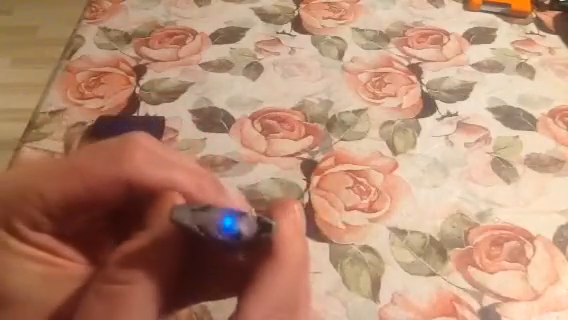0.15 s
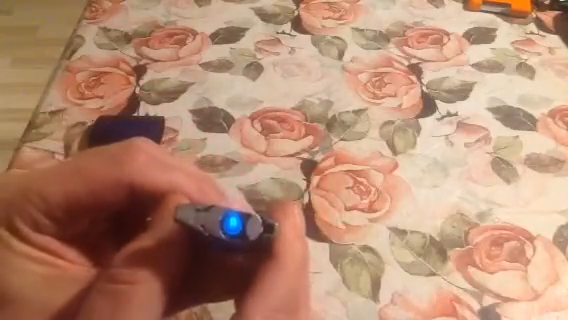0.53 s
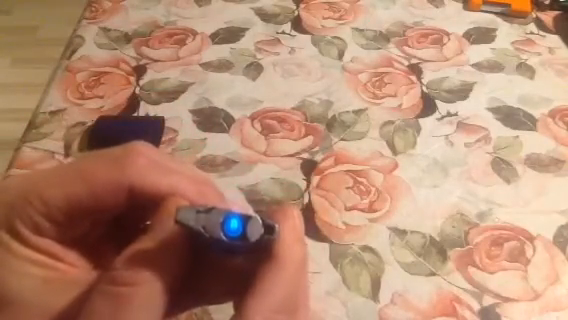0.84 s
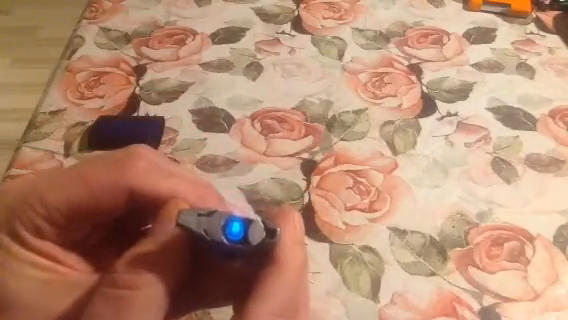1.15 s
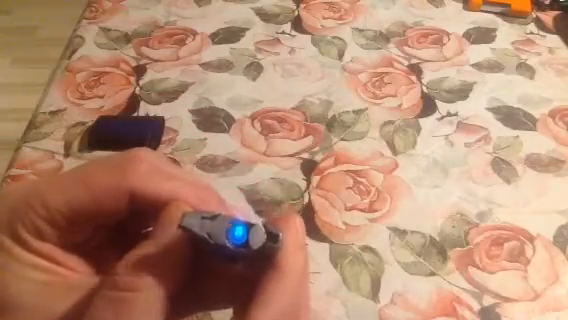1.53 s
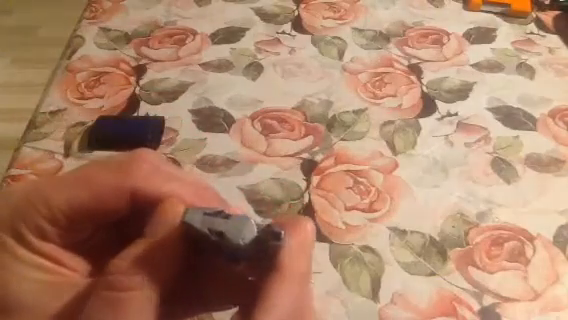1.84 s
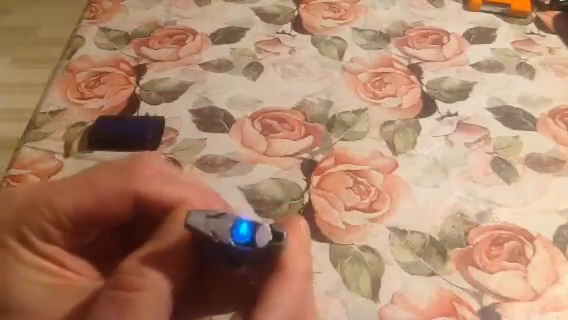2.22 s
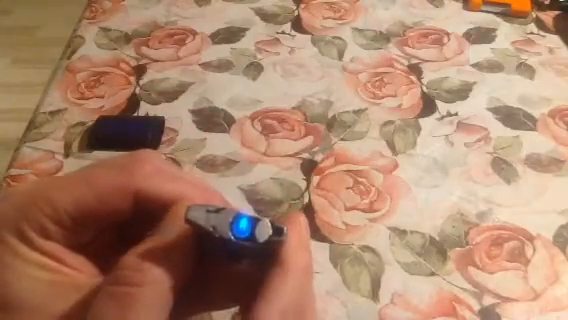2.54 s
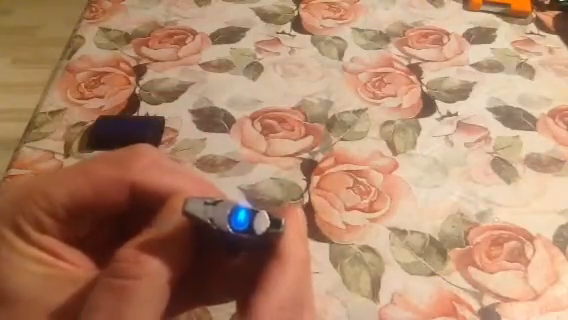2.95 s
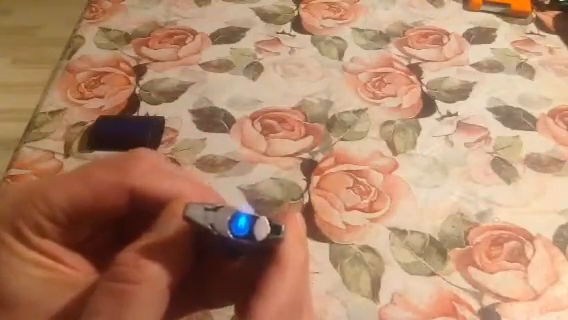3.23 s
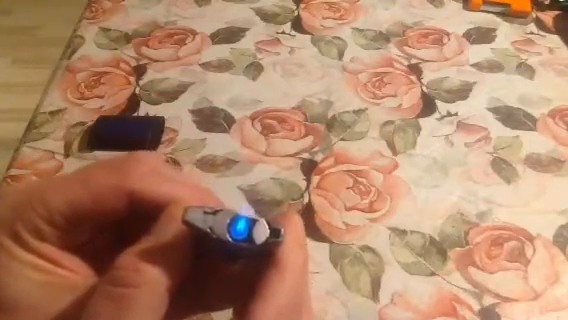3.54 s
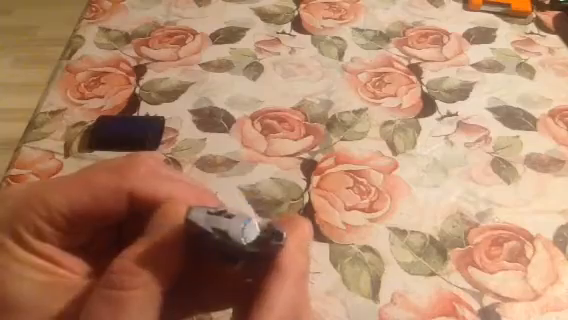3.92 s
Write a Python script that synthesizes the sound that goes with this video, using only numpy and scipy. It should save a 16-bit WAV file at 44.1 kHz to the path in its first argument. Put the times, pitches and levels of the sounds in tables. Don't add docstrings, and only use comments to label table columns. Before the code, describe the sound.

Close up in a quiet room, a jet lighter already hissing gas snaps hard and lights with a soft puff. The flame roars and hisses steadily for about a second and a half, then small clicks and a squeak end it. After a short near-silent gap, gas hisses briefly, a second snap lights a slightly longer burn, and it clicks off again.

```python
import sys
import numpy as np
from scipy import signal
from scipy.fft import rfft, irfft
from scipy.io import wavfile
from scipy.ndimage import uniform_filter1d, minimum_filter1d

SR = 44100
rng = np.random.default_rng(int(sys.argv[2]) if len(sys.argv) > 2 else 0)


def file_out(sig):
    cols = np.atleast_2d(sig).T
    lim = np.clip(cols, -1, 1)
    pcm = np.round(lim * 32767).astype(np.int16)
    wavfile.write(sys.argv[1], SR, pcm)


def convert_level_to_amplitude(level_db):
    exponent = np.asarray(level_db, float) / 20
    return 10 ** exponent


N = 179972

# (lights [s], starts closing [s], out [s], roar level [dB], swell [dB/s])
BURNS = [
    (0.189, 1.655, 1.681, -55.5, 1.94),
    (2.137, 3.889, 3.91, -55.5, 2.5),
]
# (frequency [Hz], density [dB per Hz])
ROAR_SPECTRUM = [(59, -33), (100, -21), (202, -13), (489, -14), (615, -7), (1020, -7), (1290, -2.5),
                 (1590, -12), (1900, -3.5), (3980, -10), (5000, -19), (6500, -50.5), (11000, -120)]
# (frequency [Hz], density [dB per Hz])
JET_SPECTRUM = [(3000, -34.5), (3600, -16), (4300, -9), (5000, -0.5), (6100, 1), (7200, -6.5), (8300, -7.5),
                (9200, -3.5), (9700, 0), (10600, 2.5), (11600, 4), (12600, -3), (13300, -10),
                (15400, -13.5)]
# (frequency [Hz], width [Hz], depth [dB])
HAND_DIPS = [(525, 51, -3.5), (1057, 163, -6), (1640, 200, -1), (2220, 370, -4), (3502, 148, -11.5),
             (3977, 260, -12), (9950, 210, -0.5)]
# (frequency [Hz], width [Hz], depth [dB])
TABLE_DIPS = [(2810, 110, -13), (4600, 90, -20)]
OPENING_S, SETTLE_S, DYING_S = 0.027, 0.24, 0.045
COLD_ROAR_DB, HISS_UNDER_ROAR_DB = -3, -4
ROAR_FALL_DB, HISS_FALL_DB = -12, -9

# (valve opens [s], spark [s], level [dB])
PRESSES = [
    (-.06, 0.206, -44),
    (2.088, 2.17, -48.5),
]
# (frequency [Hz], density [dB per Hz])
GAS_SPECTRUM = [(300, -30.5), (550, -12), (800, -37), (1900, -20.5), (2600, -23.5), (3800, -15.5),
                (5000, -13), (6000, -10), (6800, 0), (7600, 0.5), (8800, -4.5), (11200, -0.5), (12000, -6),
                (13500, -20), (15400, -15.5)]
# (frequency [Hz], width [Hz], depth [dB])
GAS_DIPS = [(8130, 335, -15), (9750, 300, -3.5), (12300, 500, -15), (14800, 400, -10)]
GAS_ATTACK_S, GAS_START_DB, GAS_SAG_DB_PER_S = 0.011, -13, 36.5
COCKING_S, COCKING_DB, BURN_OFF_DB_PER_S = 0.032, -1.5, 720

# (frequency [Hz], width [Hz], level [dB])
SNAP_BODY_A = [(1228, 170, -13), (2276, 300, -9.5), (3270, 300, -6), (4900, 540, -4), (6000, 250, -3),
               (7660, 500, 3.5), (8820, 410, -4.5), (9520, 440, 1.5), (12000, 850, -4.5),
               (13200, 500, -3.5), (15000, 530, -8)]
# (frequency [Hz], width [Hz], level [dB])
SNAP_BODY_B = [(1200, 160, -14), (2400, 150, -15), (3120, 290, -5.5), (4460, 630, -4), (6000, 560, -6.5),
               (7030, 660, -3.5), (9150, 500, 2.5), (11300, 490, -8.5), (12860, 580, -4), (13920, 270, -8),
               (14860, 250, -13)]
# (frequency [Hz], width [Hz], level [dB])
RESET_BODY = [(2080, 400, -19), (3490, 206, 0.5), (4280, 230, 3.5), (5000, 370, -1), (7560, 460, -1.5),
              (9800, 420, -5), (11500, 370, -4.5), (13330, 480, -3.5)]
# (frequency [Hz], width [Hz], level [dB])
STOP_BODY_A = [(2270, 130, -10), (3710, 310, -6.5), (5200, 180, -11.5), (5900, 170, -9), (6960, 580, -5),
               (9040, 260, -5), (10600, 460, -9), (11200, 220, -4.5), (12830, 770, -5), (13650, 430, 0.5)]
# (frequency [Hz], width [Hz], level [dB])
STOP_BODY_B = [(2270, 190, -8.5), (4700, 510, -2.5), (6480, 220, -4), (7130, 370, -3), (8740, 350, -0.5),
               (10400, 330, -5), (11300, 470, -9), (12900, 320, -1), (13500, 260, -10), (14200, 280, 0)]
# (time [s], peak level [dB], rattle time [ms])
SNAPS_A = [
    (.1990, -30.5, 1.9),
    (.2013, -3, 1.3),
    (.2020, -8, 0.58),
    (.2028, -9.5, 2.2),
    (.2045, -22, 1.8),
    (.2135, -31, 1.5),
]
# (time [s], peak level [dB], rattle time [ms])
SNAPS_B = [
    (2.1575, -35, 1.2),
    (2.1599, -2, 0.85),
    (2.1602, -13.5, 0.97),
    (2.1609, -10, 1.8),
    (2.1632, -16.5, 1.3),
    (2.1685, -26, 2.5),
    (2.172, -47, 1.1),
]
# (time [s], peak level [dB], rattle time [ms])
RESETS = [
    (1.6065, -18, 0.96),
    (1.6084, -26.5, 1.7),
    (3.850, -38.5, 1.2),
    (3.8566, -17.5, 0.3),
    (3.8582, -27, 1.7),
]
# (time [s], peak level [dB], rattle time [ms])
STOPS_A = [
    (1.6794, -23, 0.56),
    (1.682, -30, 2.6),
    (1.6943, -35, .6),
    (1.9526, -50.5, 1.2),
    (1.977, -51, 1.2),
]
# (time [s], peak level [dB], rattle time [ms])
STOPS_B = [
    (3.9146, -23, 1.2),
    (3.9167, -27, 1.7),
]

# (time [s], puff [dB], knock [dB], spring [dB], case [dB])
PUFFS = [
    (0.2039, -34.5, -33, -49.5, -41.5),
    (2.1611, -38, -31.5, -45.5, -44.5),
]
# (frequency [Hz], level [dB], T60 [s])
PUFF_MODES = [(184, 4.5, 0.033), (250, 2, 0.023), (317, -2, 0.03), (463, -8.5, 0.01), (133, -18, 0.17),
              (914, -6, 0.02), (1300, -9, 0.011)]
KNOCK_HZ, SPRING_HZ, CASE_HZ = 2247, 5830, 7540

# (centre time [s], frequency [Hz], peak level [dB], fall time [ms])
SQUEAKS = [
    (1.6017, 12000, -39, 1.4),
    (1.6055, 13500, -38, 2.5),
    (1.684, 11300, -49, 3.3),
    (3.853, 12300, -41, 2.5),
    (3.8555, 13500, -40, 2.1),
    (3.920, 11200, -51, 4),
]
# (time [s], frequency [Hz], peak level [dB], fall time [ms])
SLIDES = [
    (1.6472, 12500, -41, 4.5),
    (3.8825, 12450, -42, 5.0),
]
# (pitch ratio [1], level [dB])
SLIDE_CHORD = [(1.0, 0.5), (1.115, -11), (1.2, -7)]
# (time [s], frequency [Hz], peak level [dB])
PINGS = [
    (3.881, 4900, -47),
    (3.888, 7200, -45),
    (3.931, 4180, -54),
    (3.95, 4000, -57),
]
SQUEAK_RISE_MS, PING_FALL_MS = 1.7, 1.3

# (frequency [Hz], T60 [s])
ROOM_T60 = [(100, 0.24), (1000, 0.63), (4000, 0.35), (8000, 0.41), (15000, .16)]
# (frequency [Hz], density [dB per Hz])
ROOM_SPECTRUM = [(150, -10), (600, -15.5), (1500, -18.5), (3200, -10), (4500, -7.5), (5700, -7.5),
                 (6500, -9.5), (7500, -8.5), (8300, -11.5), (9500, -9.5), (12000, -8.5), (15000, -18)]
ROOM_DB = -24

# (frequency [Hz], density [dB per Hz])
FLOOR_SPECTRUM = [(24, -62), (40, -36), (98, -20.5), (119, -12.5), (201, -5.5), (271, -10), (292, -6),
                  (339, -5.5), (480, -14.5), (1510, -15.5), (1710, -19.5), (12500, -23.5), (15200, -21)]
FLOOR_DB = -64.5

# (frequency [Hz], margin [dB])
TREBLE_MARGIN = [(11500, -45), (12300, -23), (12800, -25), (13200, -20), (13700, -30), (14250, -18),
                 (14700, -25), (15200, -22.5)]
TOP_HZ, LOUD_DB, TOP_OPENS_DB = 15350, -52, -70
OVERLOAD = 0.7


def rms_one(x):
    return x / np.sqrt(np.mean(x ** 2) + 1e-20)


def at_hz(points, hz):
    known_hz, value = np.array(points).T
    return np.interp(np.log(hz + 1), np.log(known_hz), value)


def drift(rate_hz):
    steps = rng.standard_normal(400)
    return np.interp(np.arange(N) / SR * rate_hz, np.arange(400), steps)


def coloured(spectrum, dips):
    hz = np.fft.rfftfreq(N, 1 / SR)
    level_db = at_hz(spectrum, hz)
    for centre, width, depth_db in dips:
        level_db = level_db + depth_db / (1 + ((hz - centre) / (width / 2)) ** 2)
    return rms_one(irfft(rfft(rng.standard_normal(N)) * convert_level_to_amplitude(level_db), N))


def resonate(x, hz, width_hz):
    r = np.exp(-np.pi * np.clip(width_hz, 5, 5000) / SR)
    poles = [1, -2 * r * np.cos(2 * np.pi * hz / SR), r * r]
    return signal.lfilter([(1 - r * r) / 2, 0, (r * r - 1) / 2], poles, x)


def add(out, s, piece):
    i = round(s * SR)
    out[i:i + len(piece)] += piece[:N - i]


def ring(modes, t):
    return sum(convert_level_to_amplitude(db - 60 * t / t60) * np.sin(2 * np.pi * hz * t) for hz, db, t60 in modes)


def highpass(x, order, hz):
    return signal.sosfilt(signal.butter(order, hz, "high", fs=SR, output="sos"), x)


def flame():
    t, out = np.arange(N) / SR, 0
    dips = HAND_DIPS + TABLE_DIPS
    roar = convert_level_to_amplitude(0.4 * drift(6) + 0.8 * drift(40)) * coloured(ROAR_SPECTRUM, dips)
    hiss = convert_level_to_amplitude(0.5 * drift(11) + 0.71 * drift(50)) * coloured(JET_SPECTRUM, dips)
    for lit, closing, end, roar_db, swell_db in BURNS:
        flow_db = roar_db + swell_db * np.clip(t - lit, 0, 2)
        cold_db = np.interp(t, [lit + OPENING_S, lit + SETTLE_S], [COLD_ROAR_DB, 0])
        valve_s = [lit - 0.002, lit, lit + OPENING_S, closing, end, end + DYING_S]
        layers = (roar, cold_db, ROAR_FALL_DB), (hiss, HISS_UNDER_ROAR_DB, HISS_FALL_DB)
        for layer, own_db, fall_db in layers:
            valve_db = np.interp(t, valve_s, [-90, -9, 0, 0, fall_db, -40], right=-150)
            out = out + convert_level_to_amplitude(valve_db + flow_db + own_db) * layer
    return out


def gas():
    t, gain = np.arange(N) / SR, 0
    for opens, spark, level_db in PRESSES:
        valve_s = [opens, opens + GAS_ATTACK_S, spark - COCKING_S, spark]
        valve_db = np.interp(t, valve_s, [GAS_START_DB, 0, 0, COCKING_DB], left=-150)
        sag_db = GAS_SAG_DB_PER_S * np.clip(t - opens, 0, 1)
        burn_off_db = BURN_OFF_DB_PER_S * np.clip(t - spark, 0, 1)
        gain = gain + convert_level_to_amplitude(level_db + valve_db - sag_db - burn_off_db)
    return gain * convert_level_to_amplitude(0.72 * drift(30)) * coloured(GAS_SPECTRUM, GAS_DIPS)


def blows(rows, body, crack_db):
    out, t = np.zeros(N), np.arange(1500) / SR
    for s, peak_db, rattle_ms in rows:
        contacts = convert_level_to_amplitude(-17) * rng.standard_normal(len(t)) * np.exp(-1000 * t / rattle_ms)
        contacts[0] = 1
        hit = 0
        for k, (hz, width, db) in enumerate(body):
            hit = hit + (-1) ** k * convert_level_to_amplitude(db) * resonate(contacts, hz, 1.28 * width)
        hit = hit / np.abs(hit).max() + convert_level_to_amplitude(crack_db) * resonate(contacts, 5900, 4090)
        add(out, s, convert_level_to_amplitude(peak_db) * hit / np.abs(hit).max())
    return highpass(out, 2, 1100)


def ignition():
    out, t = np.zeros(N), np.arange(12000) / SR
    for s, puff_db, knock_db, spring_db, case_db in PUFFS:
        swell = 1 - np.exp(-(t / 0.00099) ** 2)
        add(out, s, convert_level_to_amplitude(puff_db) * swell * ring(PUFF_MODES, t))
        add(out, s - 0.0023, ring([(KNOCK_HZ, knock_db, 0.02)], t))
        for hz, db, width_hz in ((SPRING_HZ, spring_db, 70), (CASE_HZ, case_db, 250)):
            uneven_tone = rms_one(resonate(rng.standard_normal(len(t)), hz, width_hz))
            add(out, s + 0.0017, convert_level_to_amplitude(db - 60 * t / 0.25) * uneven_tone)
    return highpass(out, 3, 125)


def squeaks():
    out, t = np.zeros(N), np.arange(-500, 1000) / SR
    chords = [(s, hz * ratio, peak_db + db, fall_ms)
              for s, hz, peak_db, fall_ms in SLIDES for ratio, db in SLIDE_CHORD]
    pings = [(*row, PING_FALL_MS) for row in PINGS]
    for s, hz, peak_db, fall_ms in SQUEAKS + chords + pings:
        whistle = rms_one(resonate(resonate(rng.standard_normal(len(t)), hz, 450), hz, 450))
        rise = np.exp(-(1000 * t / SQUEAK_RISE_MS) ** 2)
        fall = np.exp(-np.maximum(t, 0) * 1000 / fall_ms)
        add(out, s + t[0], convert_level_to_amplitude(peak_db) * np.where(t < 0, rise, fall) * whistle)
    return out


def room(rows):
    out, t = np.zeros(N), np.arange(16000) / SR
    edges = 110 * 2 ** np.arange(0, 7.3, 0.2)
    onset = np.clip((t - 0.003) / 0.0068, 0, 1)
    for s, peak_db, _ in rows:
        tail, white = 0, rng.standard_normal((2, len(t)))
        for k, (low, high) in enumerate(zip(edges, edges[1:])):
            bandpass = signal.butter(2, [low, high], "band", fs=SR, output="sos")
            band = signal.sosfilt(bandpass, white[k % 2])
            tail = tail + band * convert_level_to_amplitude(at_hz(ROOM_SPECTRUM, low) - 60 * t / at_hz(ROOM_T60, low))
        add(out, s, convert_level_to_amplitude(peak_db + ROOM_DB) * tail * onset)
    return out


def background():
    return convert_level_to_amplitude(FLOOR_DB + 0.56 * drift(27.33)) * coloured(FLOOR_SPECTRUM, [])


def scene():
    clicks = blows(SNAPS_A, SNAP_BODY_A, crack_db=-5) + blows(SNAPS_B, SNAP_BODY_B, crack_db=-10)
    clicks = clicks + blows(RESETS, RESET_BODY, crack_db=-13)
    clicks = clicks + blows(STOPS_A, STOP_BODY_A, crack_db=-15) + blows(STOPS_B, STOP_BODY_B, crack_db=-15)
    release_tails = room([RESETS[0], RESETS[3], STOPS_A[0], STOPS_B[0]])
    release_tails = highpass(release_tails, 2, 3200)
    tails = room([SNAPS_A[1], SNAPS_B[1]]) + convert_level_to_amplitude(4.5) * release_tails
    return (flame() + gas() + clicks + ignition() + squeaks() + tails + background())[None]


def thin_treble(x):
    hz, _, frames = signal.stft(x, SR, nperseg=1024)
    bands = (np.abs(frames[:512]) ** 2).reshape(128, 4, -1).sum(axis=1)
    level_db = 10 * np.log10(uniform_filter1d(bands, size=5, axis=1) + 1e-20)
    peak_db = level_db[2:].max(axis=0)
    loudest_db = uniform_filter1d(minimum_filter1d(peak_db, size=7), size=5) + 2.5
    centre_hz = hz[:512].reshape(128, 4).mean(axis=1)[:, None]
    above_margin = level_db > loudest_db + at_hz(TREBLE_MARGIN, centre_hz)
    keep = above_margin | (peak_db > LOUD_DB) | (centre_hz < 11500)
    top = centre_hz > TOP_HZ
    keep = np.where(top, 10 * np.log10(bands + 1e-20) > TOP_OPENS_DB, keep)
    frames[:512] *= np.repeat(keep * np.where(top, convert_level_to_amplitude(-11), 1), 4, axis=0)
    return signal.istft(frames, SR, nperseg=1024)[1][:N]


def roll_off(x):
    return signal.sosfilt(signal.butter(12, 16600, fs=SR, output="sos"), x)


def record(dry):
    cut = highpass(dry[0], 5, 108)
    cut = np.clip(cut, -OVERLOAD, OVERLOAD)
    rumble = convert_level_to_amplitude(-106) * coloured([(20, -21.0), (70, 3.5), (120, -29.5), (15000, -88)], [])
    mix = thin_treble(cut + rumble)[None]
    return roll_off(mix)


dry = scene()
out = record(dry)
file_out(out)
```